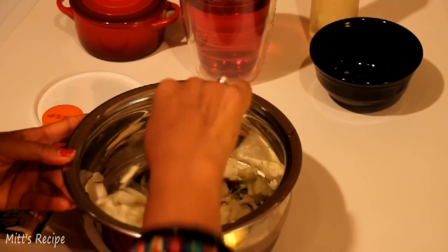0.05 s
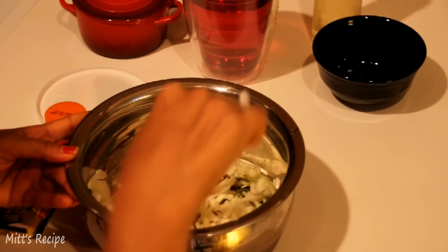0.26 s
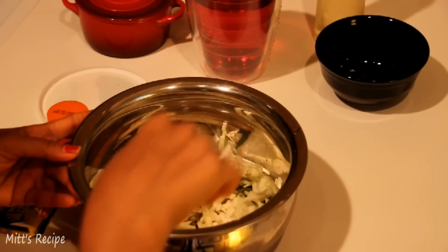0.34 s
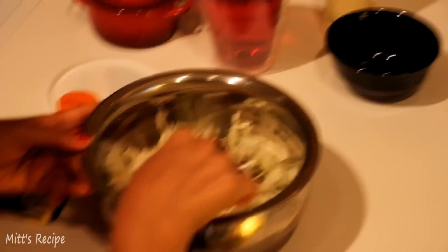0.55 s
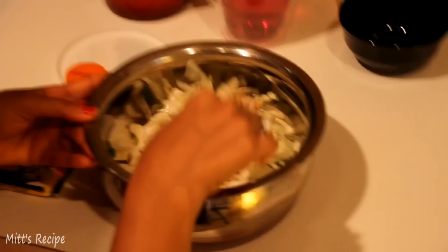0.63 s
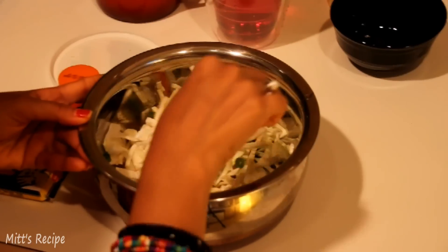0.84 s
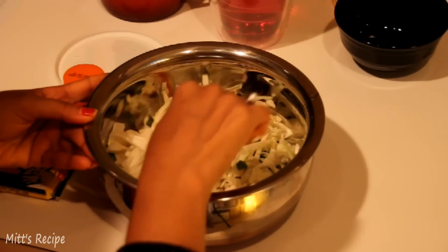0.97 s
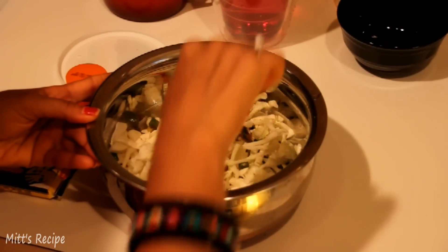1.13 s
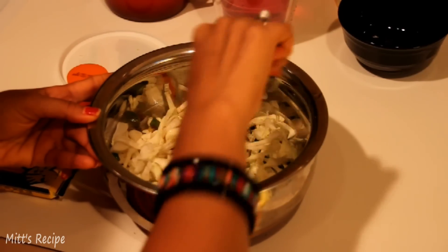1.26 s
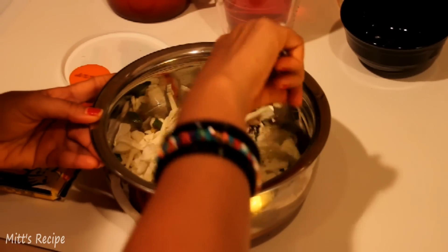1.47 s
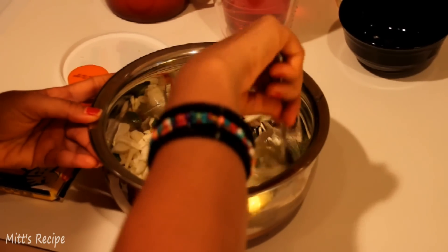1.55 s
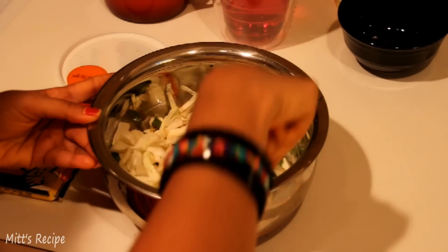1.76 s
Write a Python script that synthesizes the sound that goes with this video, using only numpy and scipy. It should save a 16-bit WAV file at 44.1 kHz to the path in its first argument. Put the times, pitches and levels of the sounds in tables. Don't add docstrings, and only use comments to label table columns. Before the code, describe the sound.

A steel bowl of wet cabbage batter rocks on a kitchen counter as a hand mixes. A fingertip ticks at 0.13 s; a hard, quickly damped knock lands at 0.21, a duller one at 0.47. Knuckle taps, soft thumps and bangle jingles cluster around 0.58-0.75. Bright knocks follow at 0.9 and 1.4, then a ringing rim clink at 1.45, fading over faint squelching, light jingling and fridge hum.

```python
import sys
import numpy as np
from scipy import signal
from scipy.io import wavfile

SR = 44100
rng = np.random.default_rng(int(sys.argv[2]) if len(sys.argv) > 2 else 0)


def ratio_of_db(decibels):
    return 10 ** (np.asarray(decibels, float) / 20)


def dump_mix(stems):
    frames = np.atleast_2d(stems).T
    limited = np.clip(frames, -1, 1)
    pcm = np.round(limited * 32767).astype(np.int16)
    wavfile.write(sys.argv[1], SR, pcm)


N = 79380

# pitch_hz, level_db (per Hz)
AIR_SPECTRUM = [(24, 2), (38, -11), (100, -10), (300, 2), (500, -13), (1100, -8.5), (2600, -16.5),
                (9000, -26.5), (15500, -37)]
# pitch_hz, width_hz, level_db
FRIDGE_HUM = [(115.6, 19, -55), (194.8, 10, -59), (321, 63, -61), (352, 49, -85)]
# pitch_hz, t60_s
ROOM_DECAY = [(250, 0.22), (1000, 0.18), (4000, 0.36), (12000, 0.3)]
# start_s, level_db
STIR_PRESSURE = [(0, -48), (.14, -49.5), (.2, -51.5), (.4, -56), (.5, -53), (.58, -47), (.64, -47.5),
                 (.67, -34), (.72, -40.5), (.79, -48.5), (.87, -51.5), (1.0, -57), (1.06, -49), (1.2, -51),
                 (1.27, -60.5), (1.5, -44), (1.65, -51), (1.8, -54)]
# start_s, level_db
WRIST_MOTION = [(0, -56.5), (.12, -55.5), (.2, -49), (.35, -87), (.48, -65), (.565, -51), (.59, -45),
                (.7, -50.5), (.86, -63), (.98, -98), (1.04, -49.5), (1.2, -56.5), (1.27, -92), (1.5, -83),
                (1.62, -43), (1.68, -59.5), (1.73, -46.5), (1.8, -57)]
# pitch_hz, level_db, t60_s
BANGLE_MODES = [(7300, -9, .04), (8600, -10, .04), (9600, -10, .04), (11500, -6, .04), (12050, -3, .03),
                (14450, -4, .04), (15500, -9, .03)]
# centre_s, level_db, pitch_hz
BANGLE_SHAKES = [(0.581, -41.5, 9800), (0.582, -40.5, 12000), (.585, -52, 14000), (.605, -55, 13200),
                 (0.622, -45.5, 8600), (.623, -44, 11000), (0.691, -43.5, 10900), (1.616, -49, 11100)]
# start_s, peak_db,
# pitch_hz, t60_s
SHORT_TICKS = [(0.131, -24.5, 1100, 0.03), (.134, -26, 1213, 0.024), (0.134, -29.5, 3300, 0.0064),
               (.131, -33, 2630, .006), (.131, -34, 5100, 0.0045), (.134, -39, 6460, 0.0034),
               (.134, -36.5, 8900, .004), (.472, -19, 239, 0.059), (.2155, -25, 4840, .018),
               (1.401, -22, 860, 0.024), (.898, -24, 5470, 0.012), (0.286, -30.5, 1500, 0.013),
               (.288, -52, 1910, 0.015), (0.665, -27.5, 4800, 0.016), (.669, -24, 3175, 0.022),
               (.677, -18, 1930, 0.01), (.696, -34.5, 5400, .012), (.746, -34.5, 1180, 0.012),
               (.672, -32, 730, 0.02), (.683, -42, 560, 0.04), (.690, -33, 5380, 0.02),
               (0.696, -35, 1800, 0.027), (0.736, -49, 1910, .03), (.788, -33.5, 1180, 0.057),
               (.788, -34, 560, 0.057), (1.775, -39, 1260, 0.055)]
# start_s, peak_db
WALL_PINGS = [
    (.6570, -14.5),
    (.6648, -20),
]
# start_s, level_db
HEEL_THUMPS = [
    (.653, -31),
    (.6975, -24),
    (.7172, -17),
    (.729, -32),
]
# start_s, level_db
RIM_CLINKS = [
    (1.4544, -26),
    (1.4575, -37.5),
    (1.463, -33),
    (1.481, -32.5),
]
# pitch_hz, level_db, t60_s
RIM_LOW_MODES = [(571, -9, .19), (1137, -8, .27), (1178, -10, .2), (1476, -11, .15), (1960, -15, .2),
                 (2853, -9, .32), (2990, -9, .13), (4072, -4, .26), (4153, -9, .33), (4840, -7, .2),
                 (4900, -8, .26), (4950, -11, .38), (5001, -14, .4), (770, -16, .15)]
RIM_MID_MODES = [(5680, 0, .18), (5732, 1, .21), (6298, -15, .25), (6422, -3, .22), (6470, -14, .5),
                 (7284, -18, .25), (7580, -15, .3), (7741, -10, .2), (7851, -2, .2), (8107, -11, .17),
                 (8445, -7, .2), (8549, -14, .42), (9205, -4, .25), (9846, -8, .21)]
RIM_HIGH_MODES = [(10540, 0, .18), (11230, -5, .1), (11930, -8, .22), (12040, -9, .21), (12390, -12, .19),
                  (12646, 3, .18), (13390, -8, .17), (14450, -18, .25), (14850, -14, .19),
                  (15400, -18, .25), (15740, -12, .19)]
# start_s, peak_db, brightness_db_per_octave, crack_db
WALL_TAPS = [
    (.646, -32.5, -20, -60),
    (.658, -26.5, -9, -56),
    (.665, -30.5, -1.5, -53),
    (.692, -51, 8.5, -50),
]
# start_s, peak_db, brightness_db_per_octave, crack_db
LEFT_EDGE_KNOCKS = [
    (.2146, -9, 3, -11.5),
    (.2165, -34.5, -17, -47),
    (.4700, -22.5, 1, -27),
    (.4716, -16, -15, -57),
]
# start_s, peak_db, brightness_db_per_octave, crack_db
RIGHT_EDGE_KNOCKS = [
    (.8972, -24.5, -19.5, -21),
    (.8983, -12, 1.5, -13),
    (1.3995, -17, -10, -48),
    (1.4017, -13, 0.5, -22),
]
# pitch_hz, level_db, t60_s
LEFT_EDGE_MODES = [(250.2, -2, 0.04), (653, -13.5, 0.1), (846, -1.5, 0.048), (1130, -1.5, 0.044),
                   (1260, 4, 0.024), (1674, 6.5, 0.022), (1910, 3.5, 0.031), (2780, -7.5, 0.035),
                   (3300, 4.5, 0.012), (3930, -3.5, 0.0086), (5690, -3, 0.0092), (8600, -32, 0.0057),
                   (11000, -14, 0.0074)]
RIGHT_EDGE_MODES = [(332, -5.5, 0.053), (740, -30, 0.2), (1037, -2, 0.055), (1322, 2.5, 0.034),
                    (1794, 2, 0.031), (2010, 3.5, 0.0081), (2937, -6.5, 0.034), (3264, 1.5, 0.028),
                    (3800, -11, 0.043), (4800, 4.5, 0.016), (5660, 7.5, 0.0043), (7120, -3, 0.015),
                    (8200, -18.5, 0.035), (231, -14.5, 0.093)]
BOWL_WALL_MODES = [(560, -37, 0.035), (924, -0.5, 0.085), (1130, 4, 0.013), (2220, -13, 0.022),
                   (3306, 6, 0.022), (4580, -30, 0.065), (5400, -21, 0.07)]
# pitch_hz, level_db
CLATTER_SPECTRUM = [(300, -15.5), (800, -2), (1600, 4), (2500, -6.5), (4500, -7), (9000, -18), (16000, -25)]
# start_s, length_s, above_hz
TREBLE_DIPS = [
    (.204, .007, 5500),
    (.461, .007, 8000),
    (.878, .016, 3200),
    (1.389, .008, 2800),
    (1.440, .009, 10500),
]


def rms_one(x):
    return x / np.sqrt(np.mean(x ** 2) + 1e-20)


def high_pass(x, order, hz):
    return signal.sosfilt(signal.butter(order, hz, "high", fs=SR, output="sos"), x)


def band_pass(x, low_hz, high_hz):
    return signal.sosfilt(signal.butter(2, [low_hz, high_hz], "band", fs=SR, output="sos"), x)


def in_time(rows):
    s, level = np.transpose(rows)
    return np.interp(np.arange(N) / SR, s, level)


def at_hz(points, hz):
    pitches, values = np.transpose(points)
    return np.interp(np.log(hz), np.log(pitches), values)


def ring(clicks, hz, t60):
    r, w = ratio_of_db(-60 / (t60 * SR)), 2 * np.pi * hz / SR
    return signal.lfilter([0, np.sin(w)], [1, -2 * r * np.cos(w), r * r], clicks + 1e-18)


def impulses(s, gains):
    out = np.zeros(N)
    np.add.at(out, (np.asarray(s) * SR).astype(int), gains)
    return out


def dying(s, gains, t60):
    return signal.lfilter([1], [1, -ratio_of_db(-60 / (t60 * SR))], impulses(s, gains) + 1e-18)


def bands(shape):
    edges = 22 * 2 ** np.arange(0, 9.7, .5)
    white = rng.standard_normal((2, N))
    out = 0
    for k, (low, high) in enumerate(zip(edges, edges[1:])):
        out = out + shape(np.sqrt(low * high)) * band_pass(white[k % 2], low, high)
    return out


def grains(per_s, spread_db):
    size = ratio_of_db(spread_db * np.minimum(rng.exponential(1, N), 4)) * rng.choice([-1, 1], N)
    return size * (rng.random(N) < per_s / SR)


def background():
    out = ratio_of_db(-48.5) * rms_one(bands(lambda hz: ratio_of_db(at_hz(AIR_SPECTRUM, hz))))
    for hz, width_hz, db in FRIDGE_HUM:
        out = out + ratio_of_db(db) * rms_one(ring(rng.standard_normal(N), hz, 3.2 / width_hz))
    return out


def kitchen(x):
    t = np.arange(N) / SR
    tail = bands(lambda hz: ratio_of_db(-60 * t / at_hz(ROOM_DECAY, hz)))
    tail = tail * np.clip((t - .004) / 0.0031, 0, 1)
    return ratio_of_db(-9) * signal.fftconvolve(x, tail / np.sqrt(np.sum(tail ** 2)))[:N]


def squelch():
    pitches = np.geomspace(550, 6500, 24)
    dealt = rng.integers(0, len(pitches), N)
    pops = grains(8000, 2.5)
    wet = sum(ring(pops * (dealt == k), hz, 12 / hz) for k, hz in enumerate(pitches))
    return ratio_of_db(in_time(STIR_PRESSURE)) * rms_one(wet)


def bangles():
    touches_per_s = 1400 / len(BANGLE_MODES)
    tinkle = rms_one(sum(ratio_of_db(db) * ring(grains(touches_per_s, 3.5), hz, t60) for hz, db, t60 in BANGLE_MODES))
    rustle = rms_one(high_pass(grains(24000, 4.3), 2, 7000))
    out = ratio_of_db(in_time(WRIST_MOTION)) * (ratio_of_db(-9) * tinkle + ratio_of_db(-2) * rustle)
    t = np.arange(N) / SR
    length_s, shake_t60_s = .012, 2 / 1400
    for s, db, hz in BANGLE_SHAKES:
        shake = ring(ring(rng.standard_normal(N), hz, shake_t60_s), hz, shake_t60_s)
        out = out + ratio_of_db(db) * rms_one(shake) * np.exp(-((t - s) / (length_s / 2)) ** 2)
    return out


def ticks():
    out = 0
    for s, db, hz, t60 in SHORT_TICKS:
        rub = rng.standard_normal(180) * np.hanning(180)
        tick = ring(signal.lfilter(rub, 1, impulses([s - .001], 1)), hz, t60)
        out = out + ratio_of_db(db - 2.5) * tick / np.abs(tick).max()
    return out


def ping():
    s, db = np.transpose(WALL_PINGS)
    hz, t60_s = 1905, .017
    swell = ring(ring(impulses(s, ratio_of_db(db - db[0])), hz, t60_s), hz, t60_s)
    return ratio_of_db(db[0]) * swell / np.abs(swell).max()


def thump():
    s, db = np.transpose(HEEL_THUMPS)
    soft = signal.lfilter(np.hanning(150) / 75, 1, impulses(s, -ratio_of_db(db)))
    return high_pass(ring(soft, 160, .018), 1, 50)


def clink():
    s, db = np.transpose(RIM_CLINKS)
    groups = [(RIM_LOW_MODES, 1.2), (RIM_MID_MODES, 1.5), (RIM_HIGH_MODES, -6.5)]
    modes = [(hz, m_db + trim_db, t60) for group, trim_db in groups for hz, m_db, t60 in group]
    out = 0
    for k, (hz, m_db, t60) in enumerate(modes):
        out = out + (-1) ** k * ring(impulses(s[:1], ratio_of_db(db[0] + m_db)), hz, t60)
    weak = []
    for hz, m_db, t60 in modes * 4:
        split_hz = 115 * np.sqrt(hz / 6060) * rng.uniform(-1.236, 1.454)
        weak.append((hz + split_hz, m_db - 5, t60 * .6))
    weak += [(hz, -21, .22) for hz in 500 + 15200 * rng.random(200) ** 1.5]
    for hz, m_db, t60 in weak:
        touches = impulses(s, ratio_of_db(db + m_db) * rng.choice([-1, 1], len(s)))
        out = out + ring(touches, hz, np.clip(t60, .02, .6))
    return out


def knocks(rows, modes):
    s, db, tilt_db, crack_db = np.transpose(rows)
    crack_hz = 4030

    def strike_db(hz):
        return db + tilt_db * max(np.log2(hz / 1500), 0)

    rings = 0
    for k, (hz, m_db, t60) in enumerate(modes):
        rings = rings + ring(impulses(s, (-1) ** k * ratio_of_db(strike_db(hz) + m_db - 5)), hz, t60)
    crack = high_pass(rng.standard_normal(N) * dying(s, ratio_of_db(crack_db - 2), .0028), 2, crack_hz)

    def clatter_band(hz):
        t60_s = .035 * (1500 / hz) ** 0.64
        return ratio_of_db(at_hz(CLATTER_SPECTRUM, hz)) * dying(s, ratio_of_db(strike_db(hz) + 6), t60_s)

    clatter = bands(clatter_band)
    slap = band_pass(impulses(s, ratio_of_db(db + tilt_db + 19)), 500, 3970)
    snap = high_pass(impulses(s, ratio_of_db(crack_db + 6.5)), 2, crack_hz)
    direct = rings + crack + clatter
    sent = ratio_of_db(-18) * rings + ratio_of_db(-6) * clatter + slap - snap
    return high_pass(np.array([direct, sent]), 3, 150)


def scene():
    left = knocks(LEFT_EDGE_KNOCKS, LEFT_EDGE_MODES)
    right = knocks(RIGHT_EDGE_KNOCKS, RIGHT_EDGE_MODES)
    direct, sent = left + right + knocks(WALL_TAPS, BOWL_WALL_MODES)
    rim = clink()
    small = ticks() + ping() + thump() + bangles()
    room = kitchen(sent + small + ratio_of_db(-7) * rim)
    return (direct + rim + small + room + squelch() + background())[None]


def hush(x):
    t = np.arange(N) / SR
    for s, length, hz in TREBLE_DIPS:
        treble = signal.sosfiltfilt(signal.butter(6, hz, "high", fs=SR, output="sos"), x)
        fade = np.clip(np.minimum(t - s, s + length - t) / .0015 + 1, 0, 1)
        x = x - (1 - ratio_of_db(-20)) * treble * fade
    return x


def band_limit(x):
    return signal.sosfilt(signal.butter(12, 16880, fs=SR, output="sos"), x)


def record(dry):
    top_cut = signal.cheby2(16, 28, 15900 * 1.008, fs=SR, output="sos")
    mix = np.clip(hush(signal.sosfilt(top_cut, dry)), -1, 1)
    return band_limit(mix)


dry = scene()
out = record(dry)
dump_mix(out)
```